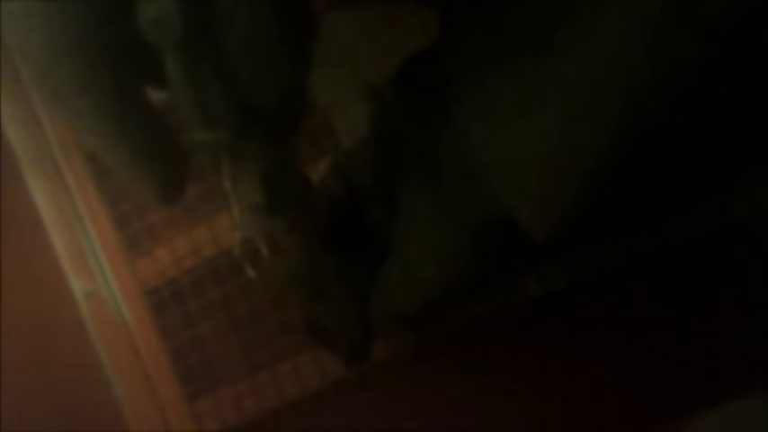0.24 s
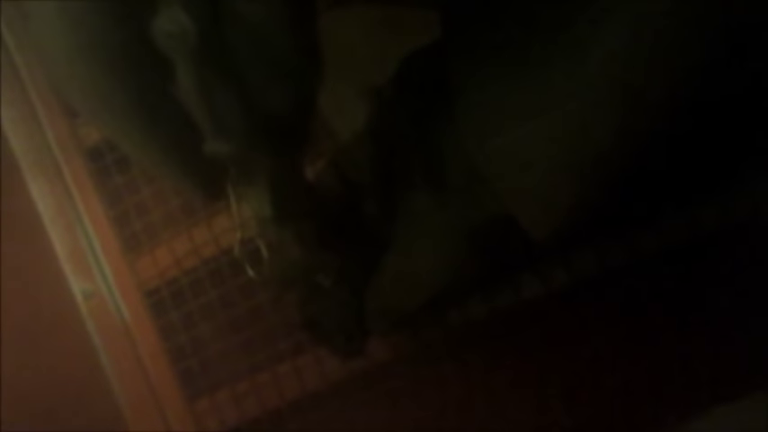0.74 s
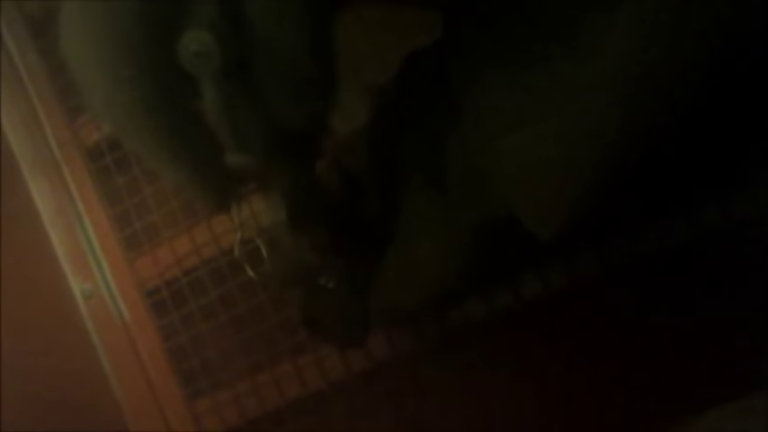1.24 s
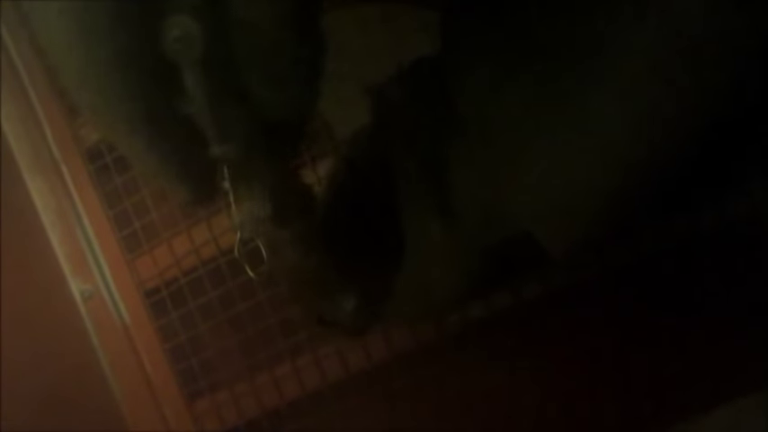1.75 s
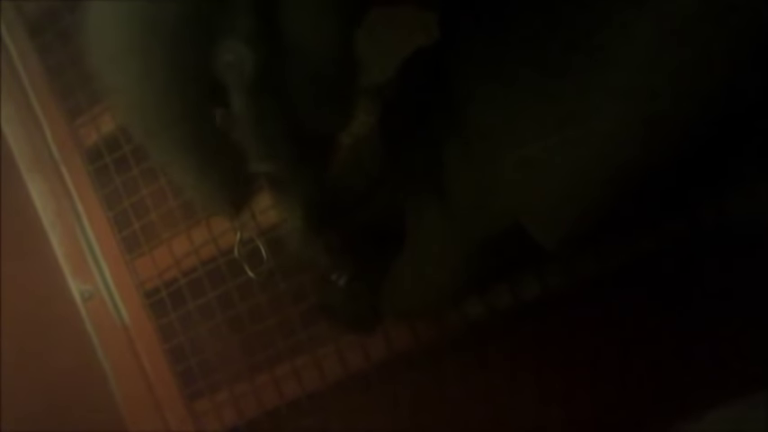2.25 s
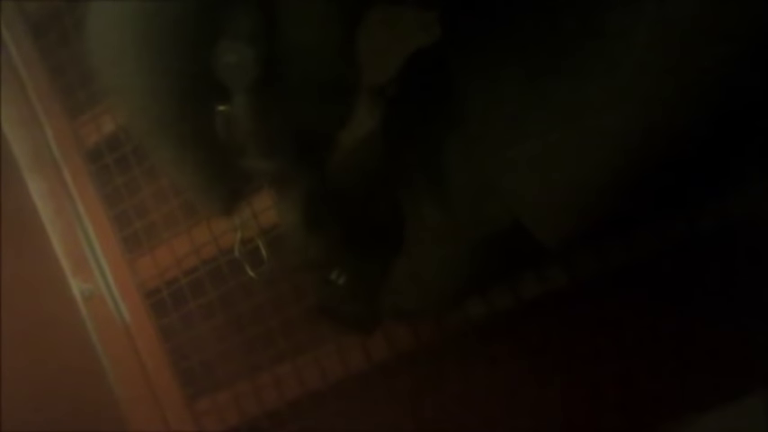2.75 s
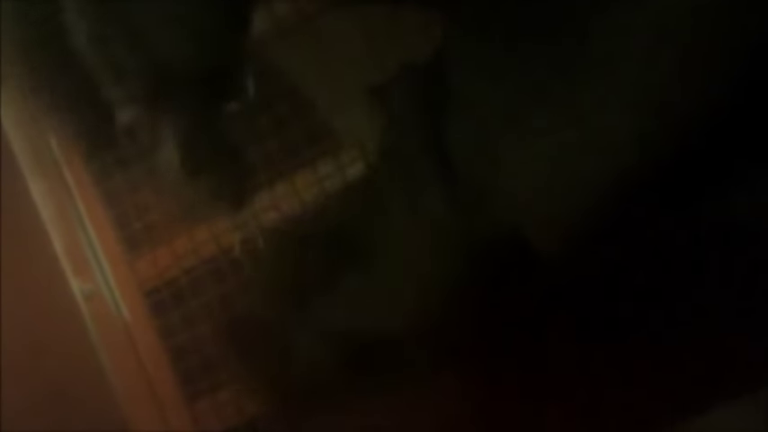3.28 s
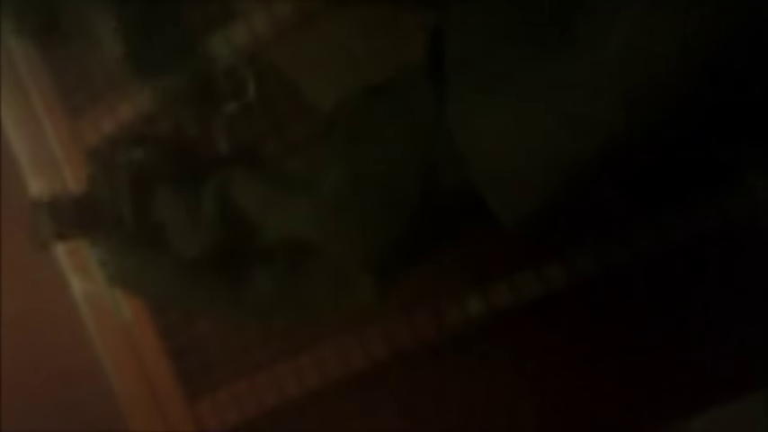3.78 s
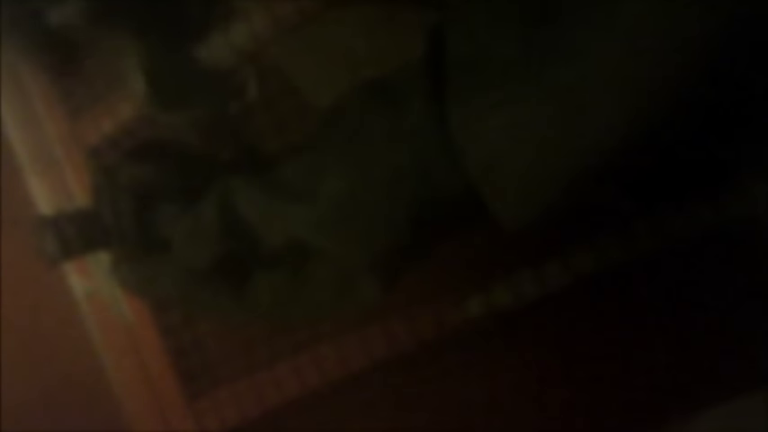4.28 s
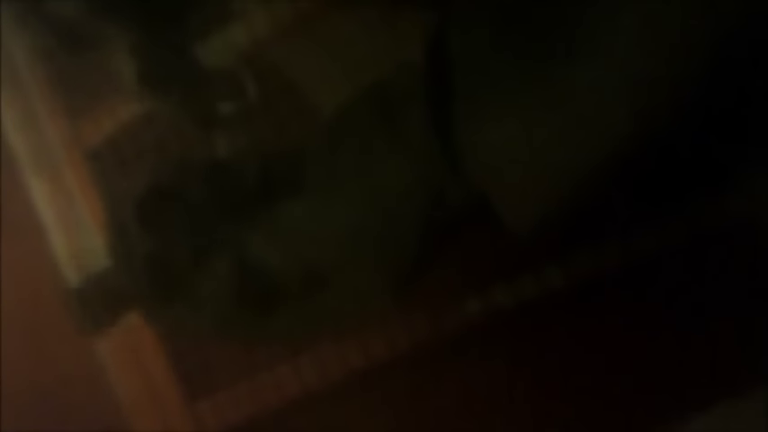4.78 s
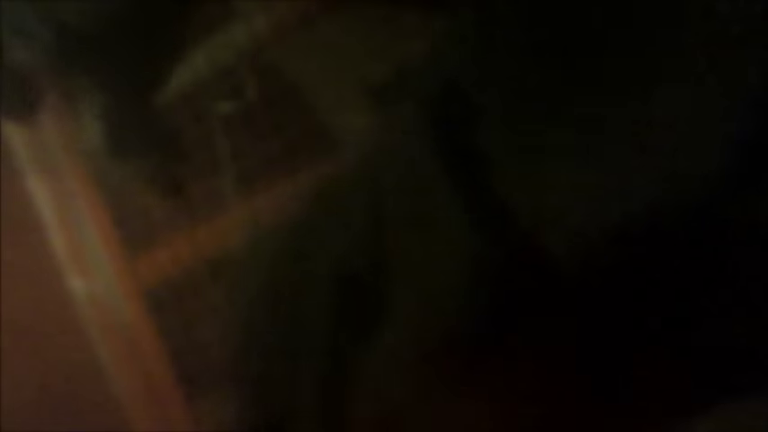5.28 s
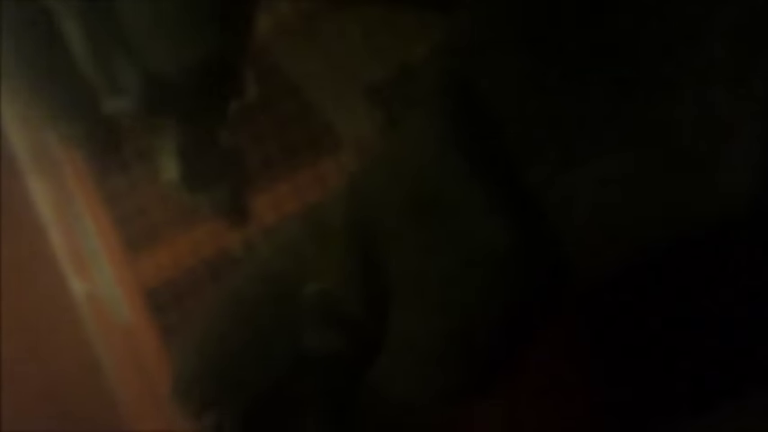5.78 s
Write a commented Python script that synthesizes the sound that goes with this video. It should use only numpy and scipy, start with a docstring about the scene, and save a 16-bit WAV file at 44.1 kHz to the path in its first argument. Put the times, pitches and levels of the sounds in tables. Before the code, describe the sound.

A blast gun fires three short bursts of hissing air and grit inside a ringing steel cabinet, over a faint extractor fan.

```python
"""Grit blasting in a steel cabinet

A blast gun fires three bursts of air and grit at a metal part. The jet's roar and hiss shift as the
part is turned, make the cabinet ring and die away in the workshop. The valve thumps as it opens and
closes. Between bursts you hear the dust extractor's fan and motor, air whistling through a leak,
a thin hiss and rubber gloves rubbing."""
import sys
import numpy as np
from scipy import signal
from scipy.fft import rfft, irfft, next_fast_len
from scipy.io import wavfile

SR = 44100
rng = np.random.default_rng(int(sys.argv[2]) if len(sys.argv) > 2 else 0)


def persist_wave(psi):
    """Save psi, clipped to +-1, as 16-bit WAV."""
    counts = np.round(np.clip(psi, -1, 1) * 32767).astype(np.int16)
    wavfile.write(sys.argv[1], SR, np.atleast_2d(counts).T)


N = 265658
TIME = np.arange(N) / SR

# how the extractor fan's rush rises and falls: time_s, relative_level_db
FAN_LEVELS = [(.3, -57.5), (2.1, -54), (3.2, -51.3), (5.2, -51.5), (5.75, -55.5)]
# the tone of that rush, from bass to treble: pitch_hz, relative_level_db
FAN_SPECTRUM = [(25, -4.5), (70, 1), (150, 1), (250, -1.5), (400, -4), (560, -4), (800, -5.5), (1200, -7.5),
                (1650, -13.5), (2100, -16), (3000, -21.5), (5000, -38), (9000, -54)]
# the notes in the extractor motor's hum: pitch_hz, usual_level_db
MOTOR_NOTES = [(120, -70), (301, -68), (360.5, -60.5), (479.5, -68), (721, -67), (840, -70.5)]
# how strongly the leak sounds: time_s, gain_db
LEAK_LEVELS = [(0, -1), (.37, 0.5), (1.6, -3.5), (1.95, -0.5), (2.15, -12.5), (3.3, -11), (6, -15.5)]
# the leak's whistles: pitch_hz, width_hz, relative_level_db
LEAK_WHISTLES = [(972, 50, -60.5), (1140, 190, -54.5), (1365, 77, -60), (1480, 100, -56),
                 (2800, 180, -67.5), (8110, 130, -68)]
# the tone of the faint background hiss: pitch_hz, relative_level_db
HISS_TONE = [(1760, -32), (3000, -10.5), (3720, -7.5), (6250, -2.5), (8750, -3.5), (13900, -1.5),
             (15000, -2.5)]
# each pull of the trigger: open_s, close_s, pressure_rise_s, open_thump_db, close_thump_db
TRIGGER_PULLS = [(.379, 1.36, 0.015, -28, -26), (2.236, 2.855, 0.02, -34.5, -24.5),
                 (3.713, 4.705, 0.013, -34, -24)]
# the tone of the jet before the cabinet colours it: pitch_hz, relative_level_db
JET_SPECTRUM = [(40, -76), (150, -67.5), (280, -68.5), (540, -69.5), (900, -62), (1600, -53.5), (2800, -59),
                (4300, -59.5), (6400, -54.5), (8500, -60.5), (11500, -59.5), (15000, -69)]
# the jet roars louder the more squarely it hits the part, one list a burst: time_s, relative_level_db
ROAR_LEVELS = [
    [(0.42, -14.0), (0.52, -16.5), (0.72, -17.5), (0.96, -16.5), (1.19, -18.5), (1.34, -18)],
    [(2.28, -14.0), (2.31, -15), (2.53, -19.0), (2.68, -17), (2.76, -19.5), (2.84, -18.0)],
    [(3.75, -16.0), (3.88, -15.5), (4.04, -19.5), (4.43, -19.5), (4.49, -17.5), (4.58, -19.5), (4.69, -17)],
]
# the sizzle follows the grit feed as it ebbs and swells, one list a burst: time_s, relative_level_db
SIZZLE_LEVELS = [
    [(0.42, -21.0), (0.52, -24.0), (0.63, -19.5), (0.79, -21.5), (0.9, -20.5), (1.15, -19.5), (1.34, -19.0)],
    [(2.28, -18), (2.37, -21.5), (2.46, -18.0), (2.56, -19.5), (2.66, -18.5), (2.76, -19), (2.84, -19.5)],
    [(3.75, -20), (3.95, -19.5), (4.25, -19.5), (4.55, -19.5), (4.61, -18), (4.69, -19.5)],
]
# the jet's five bands (boom, rumble, roar, hiss, grit spray) and what moves their levels:
# centre_hz, db_per_roar_db, db_per_sizzle_db, opening_surge_db
JET_BANDS = [(380, 1.04, 0, 4.5), (850, 1.4, -0.5, -1.5), (2200, 1, -0.5, -2), (6200, 0.3, 0.67, 4.5),
             (11000, 0.25, 2, 4.5)]
# hollows and edges of the part that sing under the jet: start_s, end_s, pitch_hz, width_hz, boost_db
PART_HOLLOWS = [(.38, 1.1, 677, 139, 4), (.38, 1.103, 1250, 250, 3), (0.378, .7, 3320, 400, 1.5),
                (.82, 1.055, 6600, 900, 4.5), (2.288, 2.88, 367, 110, 1), (2.23, 2.88, 2520, 120, 3.5),
                (2.23, 2.803, 5170, 220, 3), (2.23, 2.603, 6570, 200, 2), (2.595, 2.88, 6710, 300, 5.5),
                (3.7, 4.72, 1570, 300, 2.5), (3.7, 4.7, 3130, 250, 4), (3.72, 4.0, 3770, 900, 2),
                (3.95, 4.205, 7960, 400, 5.5), (4.18, 4.208, 5840, 2200, 4.5), (4.46, 4.53, 2200, 500, 3)]
# where the cabinet's air and panels ring: pitch_hz, width_hz, boost_db
CABINET_RINGS = [(208, 28, 8.5), (266.4, 9, 9), (326.5, 10.2, 22), (406.9, 15.3, 21), (500, 26.7, 13),
                 (567, 17, 7.5), (628, 11.4, 15.5), (686, 16.4, 12), (729, 27, 11), (823, 30, 14),
                 (939, 24, 8.5), (1014, 32.5, 10), (1113, 20, 7), (1231, 9.8, 8), (1605, 15, 2.5),
                 (1728, 38, 2), (1718, 40, 5.5), (1880, 17, 6), (2274, 76, 4), (2440, 43, 6),
                 (3290, 1000, 3), (6440, 74, 3.5)]
# how long the workshop's echo takes to fade by 60 dB: pitch_hz, fade_s
ECHO_FADES = [(80, 0.55), (250, 0.51), (600, 0.4), (1500, 0.7), (3700, 0.47), (7000, 0.4), (14000, 0.26)]
# rubs of the gloves: middle_s, half_length_s, pitch_hz, width_hz, level_db
GLOVE_RUBS = [(3.305, 0.094, 745, 200, -53), (3.417, 0.037, 230, 220, -49), (5.05, 0.2, 150, 60, -57),
              (5.396, 0.088, 1640, 200, -59), (5.97, .06, 1660, 200, -60.5)]


def from_db(db):
    """Turn decibels into a number to multiply a sound by."""
    return np.exp(np.asarray(db) * (np.log(10) / 20))


def unit_level(x):
    """Scale a signal so that its average size (rms) is 1."""
    return x / np.sqrt(np.mean(x ** 2) + 1e-20)


def at_times(points):
    """Join a table's points with straight lines, giving a value for every sample."""
    times_s, values = np.transpose(points)
    return np.interp(TIME, times_s, values)


def at_pitch(points, hz):
    """Read between a table's pitches, giving each octave equal room."""
    pitches_hz, values = np.transpose(points)
    return np.interp(np.log(hz + 1), np.log(pitches_hz), values)


def colour(x, gain_at):
    """Turn each pitch in a sound up or down by gain_at(hz)."""
    size = next_fast_len(N)
    hz = np.arange(size // 2 + 1) * SR / size
    return irfft(rfft(x, size) * gain_at(hz), size)[:N]


def noise(spectrum):
    """Make noise with the tone that a table gives."""
    white = rng.standard_normal(N) * np.sqrt(SR / 2)
    return colour(white, lambda hz: from_db(at_pitch(spectrum, hz)))


def drift(rate_hz):
    """A smooth random wobble of about size 1, mostly slower than rate_hz."""
    ticks_s = np.arange(0, TIME[-1] + 1, .001)
    hz = np.fft.rfftfreq(len(ticks_s), ticks_s[1])
    steps = rng.standard_normal(len(ticks_s))
    smooth = irfft(rfft(steps) / (1 + (hz / rate_hz) ** 2), len(ticks_s))
    return np.interp(TIME, ticks_s, unit_level(smooth))


def resonate(x, hz, width_hz):
    """Keep the part of a sound that lies near one pitch."""
    return signal.lfilter(*signal.iirpeak(hz, hz / width_hz, fs=SR), x)


def narrow_band(x, hz, width_hz):
    """Resonate twice for a clearer pitch, then set the level to 1."""
    return unit_level(resonate(resonate(x, hz, width_hz), hz, width_hz))


def fade(t, fade_s):
    """Die away by 60 dB every fade_s seconds."""
    return np.exp(-np.log(1000) * t / fade_s)


def extractor(fan_gain_db=1.5, waver_db=3.0, waver_hz=6, slip_radians=.25):
    """The dust extractor's fan makes a rush of air, and its motor adds a wavering hum."""
    rush = from_db(at_times(FAN_LEVELS) + fan_gain_db) * unit_level(noise(FAN_SPECTRUM))
    hum = 0
    for hz, level_db in MOTOR_NOTES:
        height = np.sqrt(2) * from_db(level_db + waver_db * drift(waver_hz))
        hum += height * np.sin(2 * np.pi * hz * TIME + slip_radians * drift(waver_hz))
    return rush + hum


def leak(waver_db=2.0, waver_hz=7):
    """Air sucked through a gap makes breathy whistles, each swelling and fading on its own."""
    gain_db = at_times(LEAK_LEVELS)
    air = rng.standard_normal(N)
    whistles = 0
    for hz, width_hz, level_db in LEAK_WHISTLES:
        loudness = from_db(gain_db + level_db + waver_db * drift(waver_hz))
        whistles += loudness * narrow_band(air, hz, 2 * width_hz)
    return whistles


def hiss(start_db=-58, rise_db_per_s=0.2):
    """A thin hiss lies under everything and slowly grows."""
    return from_db(start_db + rise_db_per_s * TIME) * unit_level(noise(HISS_TONE))


def thump(start_s, swell_s, thump_hz=72, ring_hz=333, ring_db=-4.0):
    """A sudden change of flow kicks the air in the cabinet and leaves a low note ringing."""
    t = np.maximum(TIME - start_s, 0)
    swell = (t / swell_s * np.exp(1 - t / swell_s)) ** 2
    kick = swell * np.sin(2 * np.pi * thump_hz * t)
    ring = fade(t, fade_s=0.34) * np.sin(2 * np.pi * ring_hz * t)
    return kick + from_db(ring_db) * ring


def valve(open_early_s=0.0047, close_early_s=0.00883):
    """The valve pushes the air just before each burst, and pulls it more sharply on closing."""
    thumps = 0
    for open_s, close_s, _, open_db, close_db in TRIGGER_PULLS:
        push = from_db(open_db) * thump(open_s - open_early_s, swell_s=0.015)
        pull = from_db(close_db) * thump(close_s - close_early_s, swell_s=0.0057)
        thumps += push - pull
    return thumps


def swing(curves):
    """How many dB a level stands above the average of its points, at every sample."""
    times_s, levels_db = np.vstack(curves).T
    return np.interp(TIME, times_s, levels_db - levels_db.mean())


def jet(gain_db=-2.06, sputter_db=0.45, sputter_hz=45, surge_s=.045):
    """Swirling air and grit make noise. Aim and grit feed shift its tone, and the grit sputters."""
    air = noise(JET_SPECTRUM)
    roar_db, sizzle_db = swing(ROAR_LEVELS), swing(SIZZLE_LEVELS)
    # pressure stored in the hose is spent in a short, bright surge at each pull
    surge = sum((TIME >= open_s) * np.exp(-np.abs(TIME - open_s) / surge_s)
                for open_s, *_ in TRIGGER_PULLS)
    stream = 0
    for centre_hz, roar_share, sizzle_share, surge_db in JET_BANDS:
        # full strength at this band's centre, nothing at the other centres
        shape = [(hz, float(hz == centre_hz)) for hz, *_ in JET_BANDS]
        band = colour(air, lambda hz: at_pitch(shape, hz))
        stream += band * from_db(roar_share * roar_db + sizzle_share * sizzle_db + surge_db * surge)
    return stream * from_db(gain_db + sputter_db * drift(sputter_hz))


def nozzle_pressure(open_s, close_s, rise_s, vent_s=0.013):
    """Pressure builds quickly when the valve opens and drains away when it closes."""
    building = 1 - np.exp(-np.maximum(TIME - open_s, 0) / rise_s)
    draining = np.exp(-np.maximum(TIME - close_s, 0) / vent_s)
    return building * draining


def metal_part(x, sweep_s=.04):
    """Each hollow in the part sings as the jet sweeps on to it and stops as the jet moves off."""
    for start_s, end_s, hz, width_hz, boost_db in PART_HOLLOWS:
        inside_s = np.minimum(TIME - start_s, end_s - TIME)
        aimed = np.clip(inside_s / sweep_s + .5, 0, 1)
        x = x + aimed * (from_db(boost_db) - 1) * resonate(x, hz, width_hz)
    return x


def steel_walls(x, echo_db=-9.0, above_hz=2200):
    """The steel walls throw back a crowd of quick echoes, heard as a short, bright ring."""
    t = TIME[:SR // 4]
    echoes = rng.standard_normal(len(t)) * fade(t, fade_s=0.091)
    keep_treble = signal.butter(2, above_hz, "high", fs=SR, output="sos")
    echoes = signal.sosfilt(keep_treble, echoes / np.linalg.norm(echoes))
    return x + from_db(echo_db) * signal.fftconvolve(x, echoes)[:N]


def cabinet(x):
    """The air and panels of the cabinet boost the pitches at which they ring."""
    for hz, width_hz, boost_db in CABINET_RINGS:
        x = x + (from_db(boost_db) - 1) * resonate(x, hz, width_hz)
    return x


def workshop_echo(x, first_echo_s=.012):
    """The room answers with a smooth wash of echoes whose highest pitches die first."""
    t, tail = TIME[:SR // 2], 0
    edges_hz = np.geomspace(30, 14950, 11)
    for low_hz, high_hz in zip(edges_hz, edges_hz[1:]):
        keep_band = signal.butter(2, [low_hz, high_hz], "band", fs=SR, output="sos")
        band = signal.sosfilt(keep_band, rng.standard_normal(len(t)))
        tail += band * fade(t, at_pitch(ECHO_FADES, np.sqrt(low_hz * high_hz)))
    tail = tail * (t > first_echo_s)
    return signal.oaconvolve(x, tail / np.linalg.norm(tail))[:N]


def gloves():
    """Rubber gloves rub as the part is turned, making soft swells of noise."""
    friction = rng.standard_normal(N)
    rubs = 0
    for middle_s, half_length_s, hz, width_hz, level_db in GLOVE_RUBS:
        swell = np.exp(-((TIME - middle_s) / half_length_s) ** 2)
        rubs += from_db(level_db) * swell * narrow_band(friction, hz, width_hz)
    return rubs


def scene(blast_echo_db=-13.5, thump_echo_db=-7.5):
    """Add up all the sounds. They are heard from one spot, so left and right are the same."""
    stream = metal_part(jet())
    # the gun moves between bursts, so each one gets its own echoes
    bursts = [steel_walls(stream * nozzle_pressure(open_s, close_s, rise_s))
              for open_s, close_s, rise_s, *_ in TRIGGER_PULLS]
    blast = cabinet(sum(burst + from_db(blast_echo_db) * workshop_echo(burst) for burst in bursts))
    thumps = valve()
    thumps = thumps + from_db(thump_echo_db) * workshop_echo(thumps)
    mono = blast + thumps + extractor() + leak() + gloves() + hiss()
    return np.array([mono, mono])


def record(dry, cutoff_hz=14950):
    """Cut away the very highest treble."""
    steep_cut = signal.ellip(12, .1, 90, cutoff_hz, fs=SR, output="sos")
    return signal.sosfilt(steep_cut, dry)


dry = scene()
out = record(dry)
persist_wave(out)
```